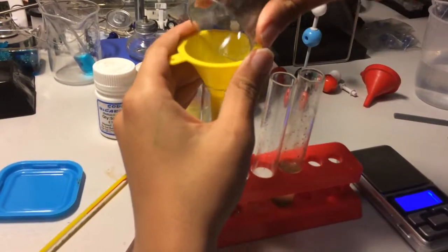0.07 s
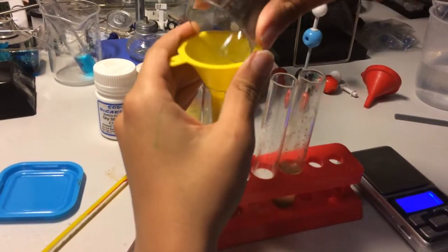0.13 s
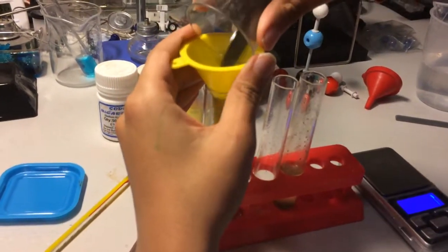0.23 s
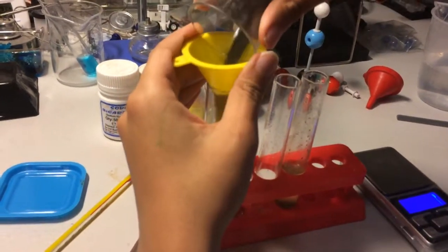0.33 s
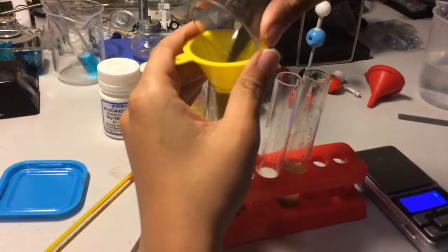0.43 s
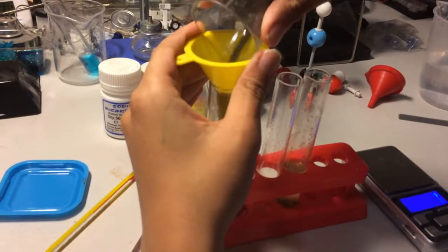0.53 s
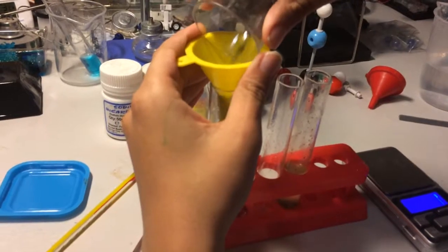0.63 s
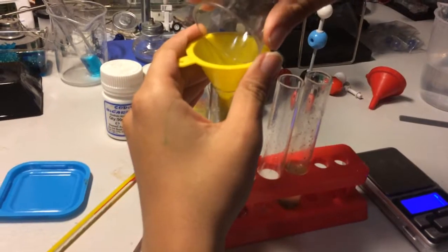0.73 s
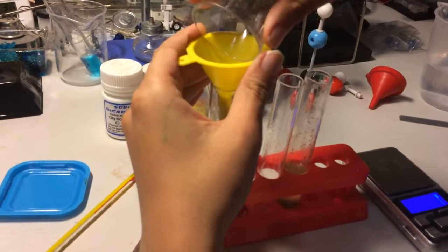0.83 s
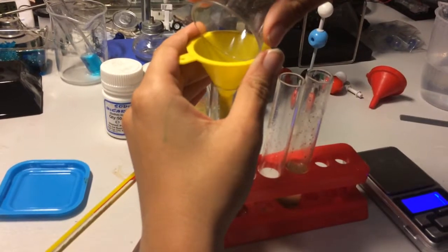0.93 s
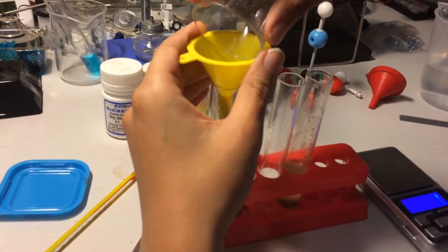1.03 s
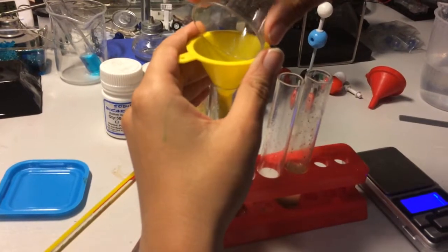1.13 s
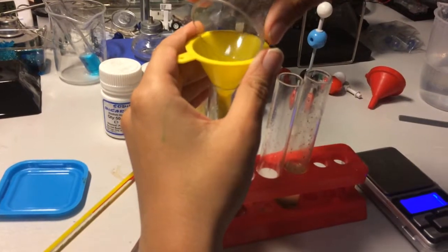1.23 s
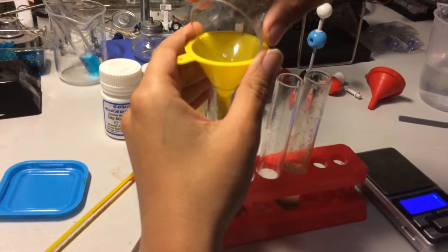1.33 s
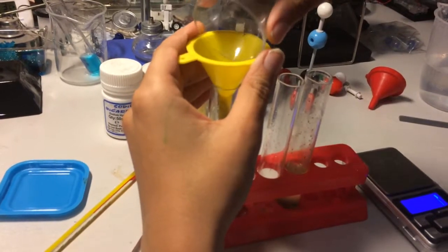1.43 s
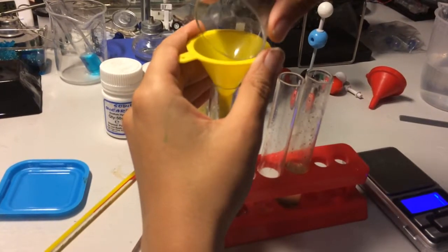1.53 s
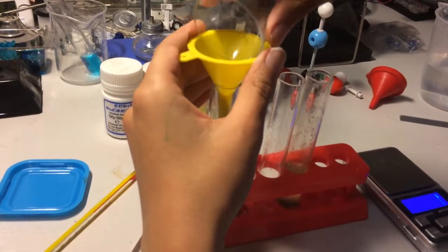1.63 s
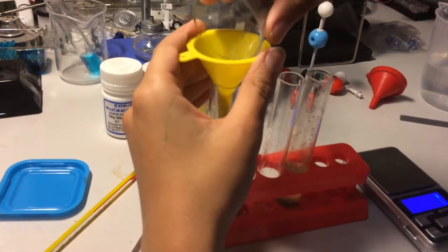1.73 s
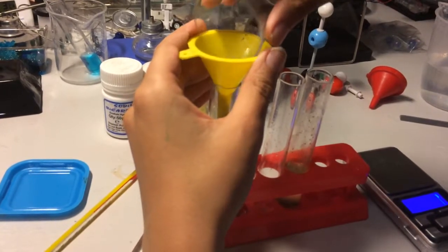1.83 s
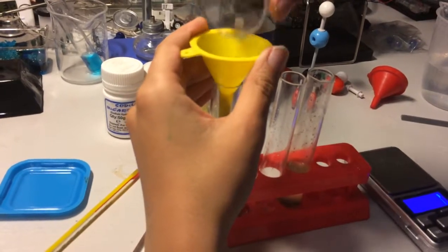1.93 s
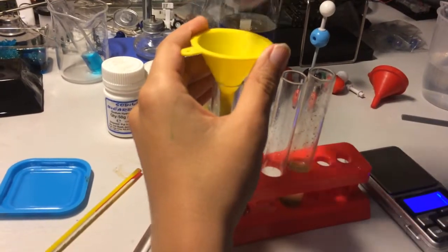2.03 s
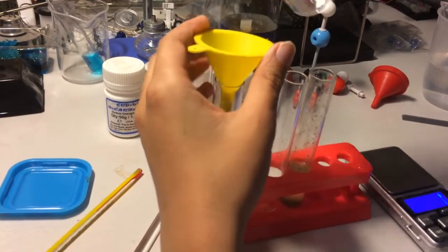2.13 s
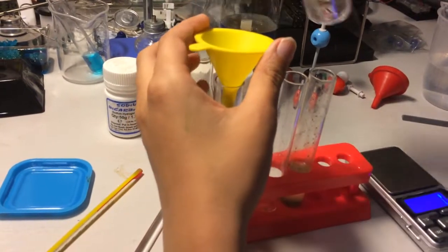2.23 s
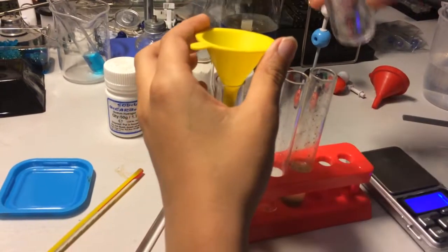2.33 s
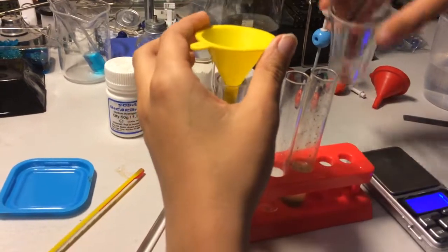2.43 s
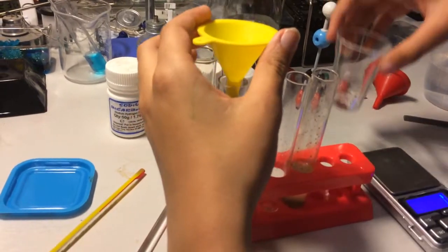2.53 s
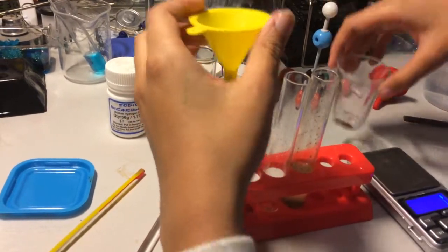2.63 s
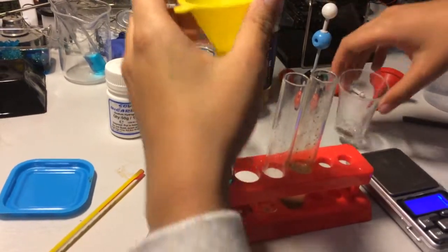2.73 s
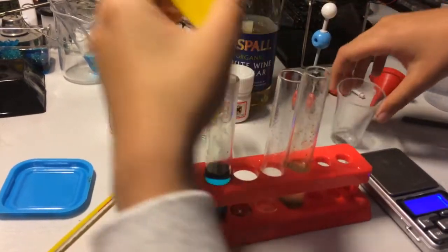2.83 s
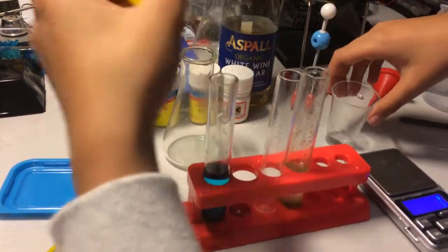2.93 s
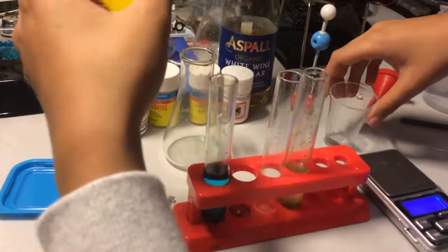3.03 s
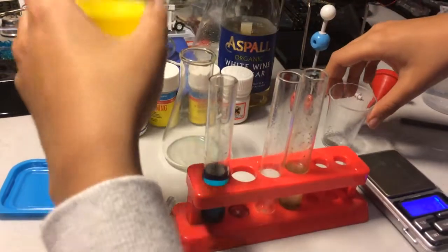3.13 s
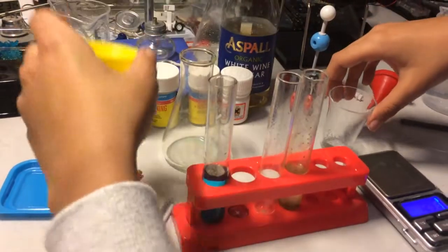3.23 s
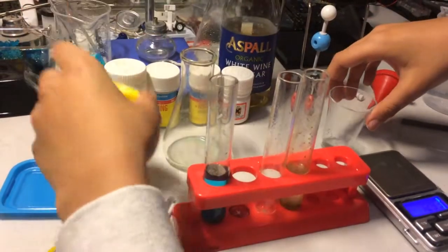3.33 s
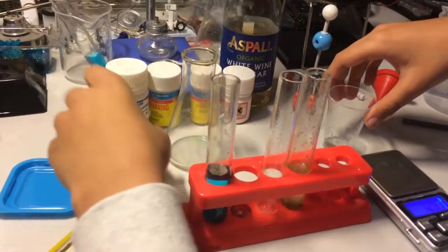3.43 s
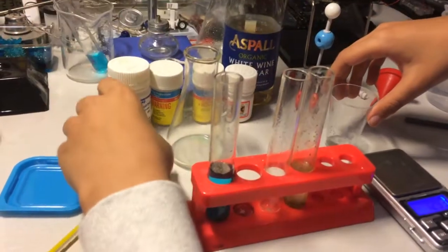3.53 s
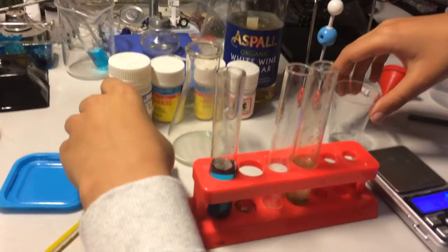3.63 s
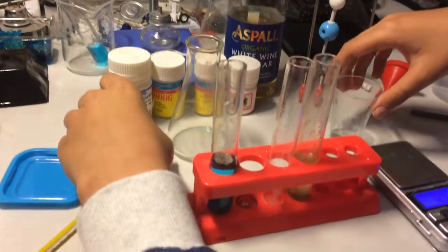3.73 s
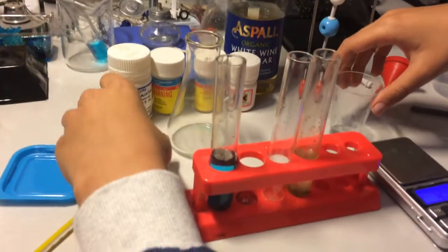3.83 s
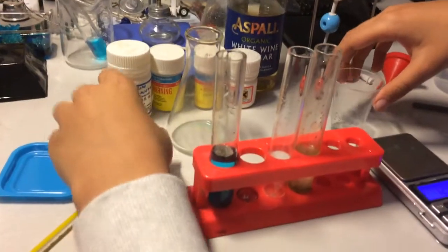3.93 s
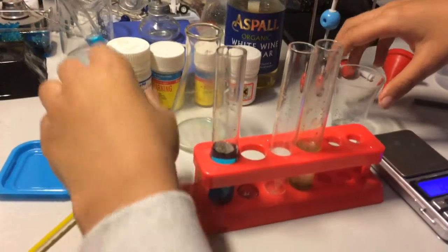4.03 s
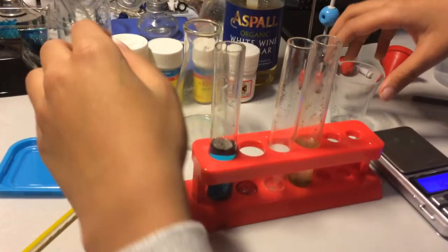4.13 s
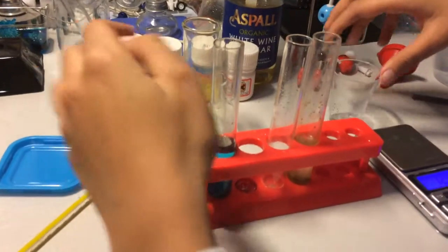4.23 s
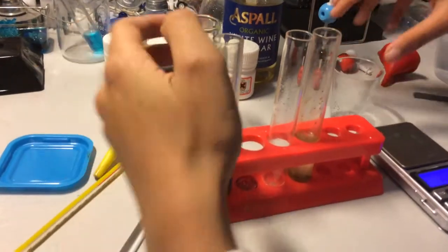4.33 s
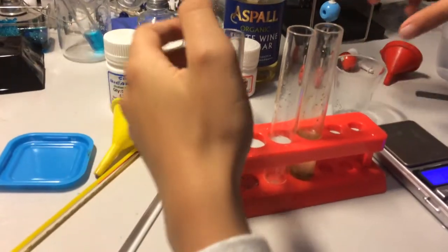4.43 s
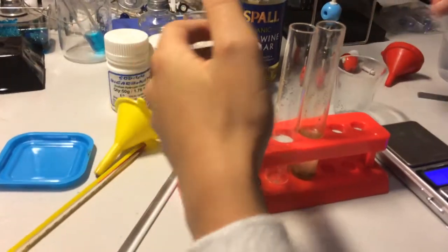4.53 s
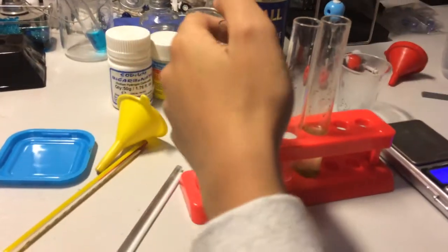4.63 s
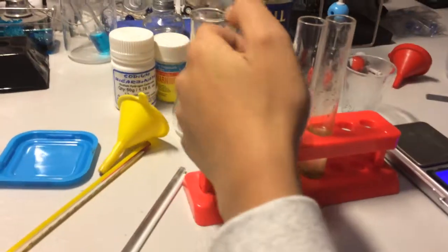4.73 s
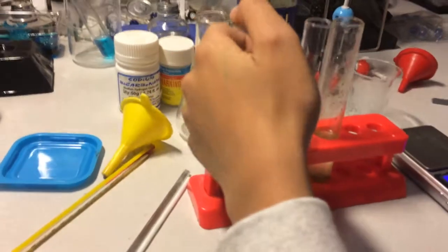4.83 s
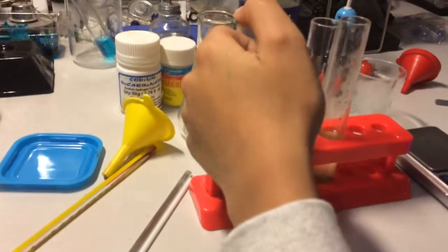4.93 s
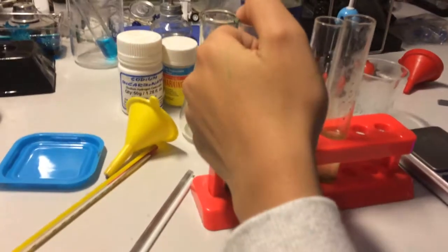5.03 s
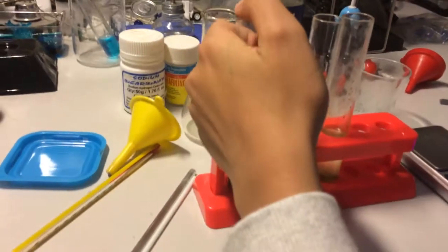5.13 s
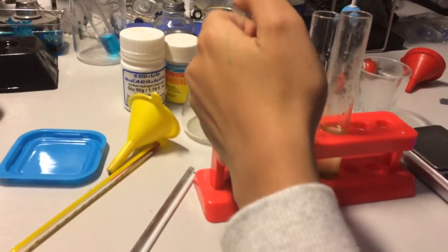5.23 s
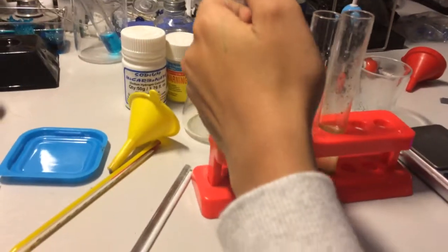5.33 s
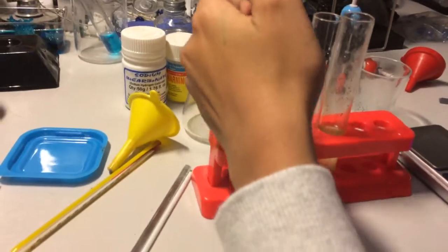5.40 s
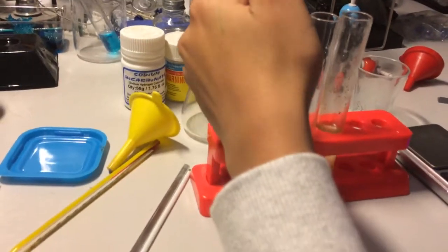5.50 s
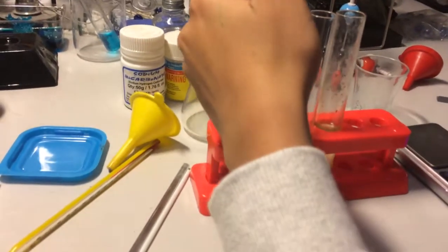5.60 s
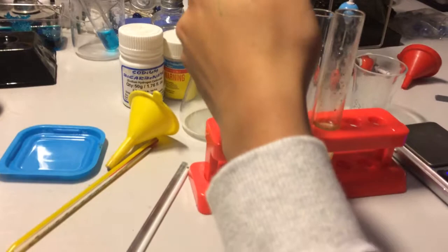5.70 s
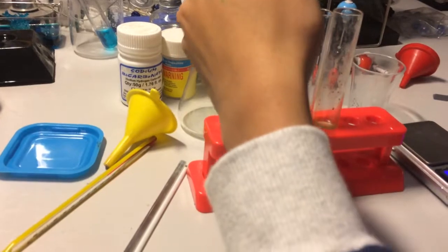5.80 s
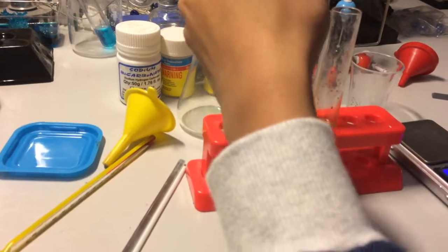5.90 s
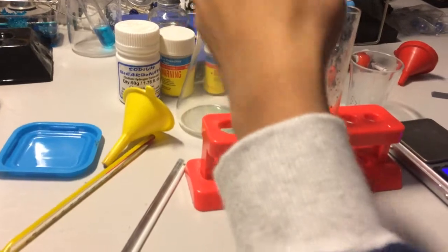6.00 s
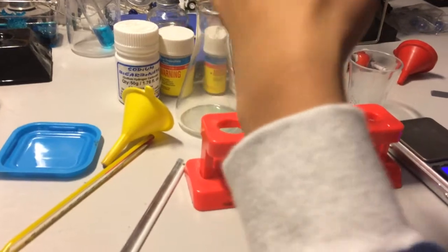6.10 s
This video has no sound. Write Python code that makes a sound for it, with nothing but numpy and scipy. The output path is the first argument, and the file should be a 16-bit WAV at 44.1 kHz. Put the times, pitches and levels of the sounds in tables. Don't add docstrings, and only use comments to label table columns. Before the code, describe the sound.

In a quiet small room with a low fridge hum, grains hiss briefly into a plastic funnel, then light taps follow. A beaker lands hard on the table with a short ring; the funnel bounces dully, is flicked and clacks down. Finally a tube knocks about in a plastic rack, which drops with a loud judder. Sparse distant ticks come through the walls. Close phone microphone.

```python
import sys
import numpy as np
from scipy import signal
from scipy.fft import rfft, irfft
from scipy.io import wavfile
from scipy.ndimage import uniform_filter1d

SR = 44100
rng = np.random.default_rng(int(sys.argv[2]) if len(sys.argv) > 2 else 0)


def wrap_up_sound(samples):
    columns = np.atleast_2d(samples).T
    tamed = np.clip(columns, -1, 1)
    steps = np.round(tamed * 32767).astype(np.int16)
    wavfile.write(sys.argv[1], SR, steps)


def gain_from_db(level_db):
    decades = np.asarray(level_db, float) / 20
    return 10 ** decades


N = 271700


def band(x, hz, width_hz):
    edges_hz = [max(hz - width_hz / 2, 10), min(hz + width_hz / 2, .48 * SR)]
    return signal.sosfilt(signal.butter(2, edges_hz, "band", fs=SR, output="sos"), x)


def unit(x):
    return x / np.sqrt(np.mean(x ** 2))


def peak(x):
    return x / np.abs(x).max()


def fade(t, t60_s):
    return np.exp(-np.log(1000) * t / t60_s)


def add(out, start_s, sound):
    i = int(start_s * SR)
    out[i:i + len(sound)] += sound[:N - i]


def read(table, hz):
    f, db = np.transpose(table)
    return np.interp(np.log(hz), np.log(f), db)


def walk(rate_hz):
    hold = int(SR / rate_hz)
    steps = np.repeat(rng.standard_normal(N // hold + 1), hold)
    return unit(uniform_filter1d(uniform_filter1d(steps, hold), hold)[:N])


def grains(rate_hz, scatter_db):
    hits = (rng.random(N) < rate_hz / SR) * rng.standard_normal(N)
    return unit(hits * gain_from_db(scatter_db * rng.exponential(size=N)))


def floor():
    # band_hz, density_db (per Hz)
    noise_tone = [(20, -25), (59, -11), (121, -8), (377, -13.5), (774, -17), (865, -12.5), (1510, -24),
                  (1900, -20), (2380, -27), (2750, -30.5), (10500, -39), (12000, -37.5), (13800, -36.5),
                  (15000, -61)]
    # pitch_hz, rms_db, wobble_hz
    hum = [(119.6, -64.5, 4.51), (90.5, -74.5, 4.8), (122.4, -67.5, 10.62), (197.6, -71.5, 7.2),
           (235, -75, 2.7), (4708, -92.5, 3.), (12250, -89, 1.5)]
    floor_db = -59
    out, swell = 0, walk(1.8)
    for hz in 24 * 2 ** np.arange(0, 9.4, 1 / 3):
        wander_db = min(300 / hz, 1) * (1.6 * swell + 2.4 * walk(9))
        db = read(noise_tone, hz) + 10 * np.log10(hz) + wander_db
        out = out + gain_from_db(db) * unit(band(rng.standard_normal(N), hz, 0.26 * hz))
    out = gain_from_db(floor_db - 3.0) * unit(out)
    for hz, db, wobble_hz in hum:
        phase = 2 * np.pi * np.cumsum(hz + wobble_hz * walk(25)) / SR
        out += gain_from_db(db + 2.0 + 2.42 * min(400 / hz, 1) * walk(42)) * np.sin(phase)
    return out


def filings():
    # time_s, level_db
    pour = [
        (0.0, -92),
        (0.11, -78),
        (0.254, -72.5),
        (0.345, -67.5),
        (0.66, -72.5),
        (0.9, -82.5),
    ]
    # pitch_hz, width_hz, level_db
    slide = [(7260, 220, 0), (8950, 570, 4.5), (12800, 590, 11.5), (13400, 160, -2)]
    cone_from_s, cone_attack_s, cone_db = 0.32, 0.027, -65.5
    t = np.arange(N) / SR
    flow_db = np.interp(t, *np.transpose(pour), right=-150)
    landed = np.clip((t - cone_from_s) / cone_attack_s, 0, 1)
    cone = landed * gain_from_db(cone_db + 0.96 * (flow_db - flow_db.max()))
    rain = grains(9800, 0.53)
    hiss = band(rain, 8700, 5900) * gain_from_db(-2.0)
    hiss = hiss + sum(gain_from_db(db) * band(rain, hz, 3 * width_hz + 400) for hz, width_hz, db in slide)
    ring = unit(band(rain, 3010, 510)) + gain_from_db(-1.5) * unit(band(rain, 5950, 4200))
    return gain_from_db(flow_db) * unit(hiss) + cone * gain_from_db(-2.5) * ring


def clicker():
    # start_s, peak_db, low_db (under 2.6 kHz), sizzle_db (over 7.8 kHz)
    ticks = [(1.073, -35, 0.5, -7.5), (2.2397, -35.5, 0, -7), (2.312, -40, 1.5, 0.54), (2.77, -32.5, 0, -7),
             (4.3444, -32.5, -1, -7.5), (4.6678, -32, 0.5, -8.5), (4.8, -32.5, -1.5, -24),
             (4.856, -37, 2, -28), (4.993, -34.5, 0.5, -19), (5.0827, -36.5, 1, -23),
             (5.3039, -33.5, 1.5, -19)]
    # pitch_hz, density_db (per Hz)
    case_tone = [(200, -9), (750, 2.5), (1060, -17), (2000, -9.5), (4300, -17.5), (6600, -29.5),
                 (9500, -35.5), (13500, -13.5)]
    # pitch_hz, width_hz, level_db (over the case)
    case_rings = [(1420, 64, 6.5), (1900, 17, 13.5), (2203, 24, 9.5), (2303, 41, 9.5), (3070, 120, 13.5),
                  (3620, 270, 10), (3950, 100, 9), (4730, 120, 10), (6400, 247, 11)]
    # delay_s, level_db, spread_s
    wall_paths = [(.001, 0, .0025), (.005, -5, .002), (.013, -6, .002), (.018, 2, .003), (.027, -7, .003),
                  (.036, -9, .004)]
    # band_hz, first_db (first arrival), late_db (later arrivals), t60_s
    room_bands = [(520, 7, -4.5, 0.19), (1900, 1.5, 6, 0.24), (3980, -1.5, 3, 0.23),
                  (6180, -1.5, -2.5, 0.26), (10700, -29, 9, 0.22)]
    # pitch_hz, width_hz, level_db
    loose_part = [(4730, 4200, 2.5), (8450, 1400, 2.5), (9400, 1400, -2), (12200, 1300, -0.5)]
    sizzle_top_db = -22
    t = np.arange(int(.25 * SR)) / SR
    paths = [gain_from_db(db) * (t > lag_s - .001) * np.exp(-np.abs(t - lag_s) / spread_s)
             for lag_s, db, spread_s in wall_paths]
    f = np.maximum(np.arange(len(t) // 2 + 1) * SR / len(t), 1)
    rings_db = sum(db / (1 + ((f - hz) / width_hz) ** 2) for hz, width_hz, db in case_rings)
    colour = gain_from_db(read(case_tone, f) + rings_db)
    same, *fresh = rng.standard_normal((len(ticks) + 1, len(t)))
    out = np.zeros(N)
    for (start_s, db, low_db, sizzle_db), own in zip(ticks, fresh):
        case = irfft(rfft(same + .6 * own) * colour, len(t))
        parts = []
        for hz, first_db, late_db, t60_s in room_bands:
            diffuse = gain_from_db(-3.5) * (1 - np.exp(-t / 0.005)) * fade(t, 1.15 * t60_s)
            shape = gain_from_db(first_db) * paths[0] + gain_from_db(late_db) * (sum(paths[1:]) + diffuse)
            parts.append(band(case, hz, hz if hz < 1000 else 0.86 * hz) * shape)
        low = peak(parts[0] + parts[1])
        middle = peak(parts[2] + parts[3])
        sizzle = peak(parts[4])
        hiss = sum(gain_from_db(d) * band(band(own, hz, width_hz), hz, width_hz) for hz, width_hz, d in loose_part)
        rattle = gain_from_db(2.92 * sizzle_db + 1.5) * peak(hiss * shape)
        sizzle = gain_from_db(min(sizzle_db, sizzle_top_db)) * sizzle
        add(out, start_s, gain_from_db(db) * (middle + gain_from_db(low_db) * low + sizzle + rattle))
    return out


def body(clear, tone, t60_s, slope, count=200):
    hz = 250 + 14000 * ((np.arange(count) + rng.random(count)) / count) ** 2
    dense = np.transpose([hz, 0 * hz, t60_s * (1000 / hz) ** slope])
    hz, db, t60_s = (c[:, None] for c in np.vstack([clear, dense]).T)
    db = db + read(tone, hz) + 10 * np.log10(np.sqrt(hz) / t60_s)
    loose = np.where(np.arange(len(hz)) < len(clear), .3, 1)[:, None]
    return hz, db, t60_s, loose


def knocks(events, modes, scatter_db, focus_db, chatter_db, thud_db, ring, grip, top_hz=13350, soft=0):
    split_hz, in_phase = 2500, .6
    hz, db, t60_s, loose = modes
    t = np.arange(int(.15 * SR)) / SR
    waves = np.sin(2 * np.pi * hz * t)
    chance = rng.standard_normal((len(events), 2, len(hz), 1))
    forces = rng.standard_normal((len(events), 1500))
    low = hz[:, 0] < split_hz
    hardest_db = max(row[1] for row in events)
    thud = np.sin(2 * np.pi * 150 * t) * (1 - np.exp(-t / 0.00057)) * fade(t, 0.011)
    out = np.zeros(N)
    for (start_s, peak_db, treble_db, best_hz, chatter_ms), (mix, side), force in zip(events, chance, forces):
        length = np.clip(ring + grip * (hardest_db - peak_db), .1, 1.3)
        octaves_off = np.minimum(np.abs(np.log2(hz / best_hz)), 1.5)
        focus = -focus_db * octaves_off * (hz < split_hz)
        sign = np.sign(loose * side + in_phase)
        rings = sign * gain_from_db(db + scatter_db * loose * mix + focus) * fade(t, t60_s * length) * waves
        force = gain_from_db(chatter_db) * force * np.exp(-1000 * t[:len(force)] / max(chatter_ms, .1))
        force[0] = 1
        edge = force * np.where(np.arange(len(force)) > 0, gain_from_db(4.0), 1)
        dull = signal.fftconvolve(rings[low].sum(0), force)
        bright = signal.fftconvolve(rings[~low].sum(0), edge)
        dull = peak(band(band(dull, 1712, 2544), 1644, 3640))
        bright = band(bright, (top_hz + 2800) / 2, top_hz - 2800)
        bright = peak(band(bright, (top_hz + 2000) / 2, top_hz - 2000))
        if soft:
            dull = peak(peak(band(dull, best_hz, soft * best_hz)) + gain_from_db(treble_db + 8) * dull)
        add(out, start_s + 0.0011, gain_from_db(peak_db) * (dull + gain_from_db(treble_db) * bright))
        add(out, start_s + 0.0017, gain_from_db(peak_db + thud_db) * thud)
    return out


def funnel_taps():
    # start_s, peak_db, treble_db (over 2.5 kHz), best_hz, chatter_ms
    taps = [(1.43, -53, -22, 1040, 0.65), (1.63, -45.5, -4, 1350, 0.69), (1.6695, -39.5, 2, 1350, 2),
            (1.679, -41.5, -5.5, 1200, 0.57), (1.84, -48, -9, 1380, .54), (1.858, -33.5, -1.5, 1390, 0.55),
            (1.87, -42.5, -8, 1210, 0.54), (1.881, -57, -15, 1420, .5), (2.228, -63, 6, 1900, .5),
            (2.69, -71, 17, 1500, 2.9), (2.702, -72, 17, 1510, 13)]
    # pitch_hz, level_db (over the dense modes), t60_s
    clear = [(1336, 27, 0.023), (1080, 14, 0.017), (2580, 7, 0.0097), (2820, 25, 0.015),
             (3190, 20.5, 0.012), (3600, 15.5, 0.011)]
    # pitch_hz, level_db
    tone = [(300, -21), (800, -10), (1350, 4), (2050, -45), (2800, 1), (3900, 1), (6000, -21), (14000, -47)]
    return knocks(taps, body(clear, tone, 0.048, 0.33), 2.8, 3.7, -19.5, -45, ring=0.92, grip=0.0028)


def rubbing():
    # hardest_s, dull_db, bright_db (re dull), swell_s, release_s (times for 20 dB)
    strokes = [
        (2.705, -70, -6, 0.068, 0.046),
        (3.294, -63.5, -26, 0.13, 0.046),
        (5.31, -52, -16, 0.09, 0.12),
        (5.56, -64.5, -23, 0.19, 0.16),
        (5.826, -68, -4, 0.13, 0.084),
    ]
    out, t = 0, np.arange(N) / SR
    for hardest_s, db, bright_db, swell_s, release_s in strokes:
        press = gain_from_db(db - 20 * np.maximum((hardest_s - t) / swell_s, (t - hardest_s) / release_s))
        slips = grains(3600, 1.5) * gain_from_db(3.3 * walk(60))
        dull = unit(band(band(slips, 950, 1500), 1000, 1700))
        out = out + press * (dull + gain_from_db(bright_db) * unit(band(slips, 7900, 3500)))
    return out


def beaker_set_down():
    # start_s, peak_db, treble_db (over 2.5 kHz), best_hz, chatter_ms
    touches = [
        (2.867, -36.5, -20, 860, 0.83),
        (2.896, -47.5, -11, 915, 1.3),
        (2.9435, -37, -17, 900, 3.6),
    ]
    landings = [
        (2.9605, -8, -13.5, 1514, .4),
        (2.9638, -18, -12, 1500, .6),
        (2.9658, -9, -18, 1500, 0.5),
        (2.9711, -14, -15.5, 1527, 1.0),
    ]
    # pitch_hz, level_db (over the dense modes), t60_s
    clear = [(406, 7.2, 0.029), (1564, 5.2, 0.093), (879, 10, 0.0806), (1125, 7.7, 0.08), (1314, 4.5, 0.16),
             (1430, 3.7, 0.39), (1531, 13.2, 0.077), (1846, 5.7, 0.075), (2034, 8.6, 0.13),
             (2270, 8.5, 0.098), (2567, 14, 0.072), (4830, 9, .018), (1780, 5.9, 0.093), (4900, 8, 0.028)]
    # pitch_hz, level_db
    tone = [(280, -50), (400, -2), (850, -12), (1500, 3.5), (2300, -5.5), (3300, -23), (3900, -28),
            (8000, -42.5), (14000, -36)]
    beaker = body(clear, tone, 0.16, 0.35)
    out = knocks(touches, beaker, 7.9, 37.0, -10, -32.5, ring=0.55, grip=.03, soft=0.92)
    return out + knocks(landings, beaker, 3.7, 1.4, -21.5, -37.0, ring=0.73, grip=0.042)


def glass():
    # start_s, pitch_hz, peak_db, t60_s
    tings = [(3.9, 8800, -67, 0.066), (4.806, 9900, -62, 0.07), (4.838, 9950, -64, 0.05),
             (4.935, 6200, -72, .15), (2.9615, 10600, -38, 0.03), (2.9615, 12350, -41, 0.022),
             (2.9615, 7560, -43, .04), (5.004, 7350, -43.5, .025), (5.003, 11000, -47, .028),
             (5.004, 12900, -44, 0.03)]
    # start_s, length_s, pitch_hz, rms_db, fall_db (per overtone)
    squeaks = [
        (5.161, 0.025, 604, -44, -4.5),
        (5.72, 0.11, 575, -60, -35),
    ]
    out = np.zeros(N)
    t = np.arange(int(.2 * SR)) / SR
    for start_s, hz, db, t60_s in tings:
        add(out, start_s, gain_from_db(db) * (1 - np.exp(-t / 0.0002)) * fade(t, t60_s) * np.sin(2 * np.pi * hz * t))
    for start_s, length_s, hz, db, fall_db in squeaks:
        i = np.arange(int(length_s * SR))
        phase = 2 * np.pi * np.cumsum(hz * (1 + 0.016 * walk(60)[i])) / SR
        tone = sum(gain_from_db(k * fall_db) * np.sin((k + 1) * phase) for k in range(3))
        swell = gain_from_db(db + 3.5 + 2.4 * walk(490)[i]) * np.hanning(len(i)) ** 0.47
        add(out, start_s, swell * tone)
    return out


def funnel_drop():
    # start_s, peak_db, treble_db (over 2.5 kHz), best_hz, chatter_ms
    bounces = [
        (3.288, -53, -30, 520, 5),
        (3.3905, -25, -32, 1500, 0.3),
        (3.3951, -27, -40, 1300, .4),
        (3.3997, -27, -44, 1300, 0.4),
    ]
    # pitch_hz, level_db (over the dense modes), t60_s
    clear = [(408, 19, .045), (545, 3, .06), (665, 6, .08), (875, 9, .09), (1106, 22, .08), (1315, 13, .1),
             (1398, 6, .08), (1514, 27, .12), (1750, 21, .11), (2150, 16, .06)]
    # pitch_hz, level_db
    tone = [(250, -45), (400, 9), (1000, -5.5), (1500, -5.5), (2200, -43), (3000, -37), (14000, -37)]
    modes = body(clear, tone, 0.034, 0.27)
    return knocks(bounces, modes, 1.3, 7.0, -8, -38, ring=0.95, grip=0.02, top_hz=3500)


def nail_flicks():
    # start_s, peak_db, treble_db (over 2.5 kHz), best_hz, chatter_ms
    flicks = [
        (3.531, -68, 8, 1500, 1.5),
        (3.5985, -55, 8, 1500, 2.3),
        (3.609, -47, 1.8, 1110, 6.5),
        (3.855, -71, 8.8, 1500, 3.4),
        (4.319, -65, 8, 1500, 0.68),
        (4.33, -69, 8, 1500, 0.55),
    ]
    # pitch_hz, level_db (over the dense modes), t60_s
    clear = [(1100, 6.9, 0.022), (3630, 15, 0.025), (4870, 4, .015)]
    # pitch_hz, level_db
    tone = [(250, -27), (1200, 16), (2500, -4), (5000, -12), (9000, -14), (14000, -10.5)]
    return knocks(flicks, body(clear, tone, 0.012, 0.27), 2.4, 3, -13.5, -24, ring=1.0, grip=0)


def funnel_down():
    # start_s, peak_db, treble_db (over 2.5 kHz), best_hz, chatter_ms
    contacts = [
        (3.804, -69.5, -14, 950, .5),
        (3.9525, -38.5, 4, 800, 4.1),
        (4.108, -61, 0, 1490, .5),
    ]
    # pitch_hz, level_db (over the dense modes), t60_s
    clear = [(800, 15, 0.027), (1740, 2.1, 0.018), (2540, 3.6, 0.025), (3240, 8.2, 0.021)]
    # pitch_hz, level_db
    tone = [(250, -30), (600, -16), (1300, -11), (1900, -15), (3400, -14.5), (3900, -9), (5500, -19),
            (9000, -31), (14000, -39)]
    return knocks(contacts, body(clear, tone, 0.021, 0.46), 0.69, 6.1, -13.0, -4, ring=0.66, grip=0.017)


def funnel_tips():
    # start_s, peak_db, treble_db (over 2.5 kHz), best_hz, chatter_ms
    clacks = [
        (4.0028, -23, -10.5, 1900, 0.5),
        (4.008, -41, -5, 1900, 6),
        (4.021, -43, -14, 1400, 3),
    ]
    # pitch_hz, level_db (over the dense modes), t60_s
    clear = [(1790, 15, 0.011), (1540, 8.2, 0.018), (2250, 15, 0.013), (2400, 9.4, 0.012),
             (3280, 20, 0.012), (3430, 11, .014), (1110, 6, .012)]
    # pitch_hz, level_db
    tone = [(250, -19), (1000, -5), (1800, 10), (2550, 9.5), (2850, -19), (3300, -6), (3700, -57),
            (14000, -44)]
    modes = body(clear, tone, 0.024, 0.23)
    return knocks(clacks, modes, 0.76, 2.4, -12, -35, ring=1.0, grip=0, top_hz=3750)


def rack_knocks():
    # start_s, peak_db, treble_db (over 2.5 kHz), best_hz, chatter_ms
    tube_knocks = [(4.836, -34, -15, 1270, 6.4), (4.875, -31.5, -15, 1420, 1.4),
                   (4.887, -35, -14.5, 1080, 1.3), (5.116, -40, -33, 756, 6), (5.132, -62, -25, 1200, 1.5),
                   (5.147, -40.5, -13, 1210, 2.7), (5.18, -38.5, -14, 920, 8.8),
                   (5.194, -43.5, -28, 1500, 2.5), (5.234, -39.5, -13.5, 1590, 3.3),
                   (5.255, -42.5, -15, 1490, 16), (5.283, -33, -16, 875, 4), (5.339, -33.5, -23, 1550, 1.5),
                   (5.317, -39, -25, 1470, 1.7), (5.356, -33, -16, 1050, 1.4),
                   (5.375, -22.5, -6.5, 1080, 3.7), (5.398, -31.5, -8, 1370, 0.75),
                   (5.527, -41.5, -12, 784, 3.8), (5.539, -45, -20, 1500, 3.2), (5.546, -44, -22, 1000, 2),
                   (5.575, -43, -16, 1480, 6.5), (5.626, -28, -10, 1010, 3.1), (5.638, -36, -11, 748, 3.8),
                   (5.672, -44, -22, 1230, 1.8), (5.825, -51, -10, 1420, 6.6)]
    judders = [(5.4165, -20.5, -10, 1250, 1.5), (5.4245, -4.5, -11, 1000, 1), (5.42635, -8, -16, 1000, 1),
               (5.4319, -19, -9, 1050, 3), (5.4356, -18, -11, 850, 3), (5.4402, -14, -13, 800, 3),
               (5.4439, -14, -13, 1200, 3), (5.4495, -14, -11, 1250, 3), (5.457, -17, -13, 1400, 3),
               (5.466, -25, -9, 950, 2), (5.472, -28, -8, 1200, 2), (5.6025, -34, -26, 850, 1.5)]
    # pitch_hz, level_db (over the dense modes), t60_s
    clear = [(608, 0, .07), (782, 13, .1), (853, 12, .09), (975, 7, .1), (1078, 9, .11), (1215, 10, .12),
             (1333, 2, .09), (1440, 8, .11), (1742, 4, .08), (1910, 7, .1), (2480, 6, .07), (3085, 6, .05),
             (3494, 6, .07)]
    # pitch_hz, level_db
    tone = [(280, -51), (520, -34), (800, -17.5), (1150, -7), (1600, 0), (2300, -3), (4500, -13.5),
            (14000, -28.5)]
    rack = body(clear, tone, 0.11, 0.16)
    out = knocks(judders, rack, 1.2, 4.8, -12, -15.5, ring=0.39, grip=0.0028, soft=0.88)
    return out + knocks(tube_knocks, rack, 7.0, 12.0, -17.5, -26.0, ring=0.44, grip=0.0026, soft=0.5)


def room(x):
    # band_hz, t60_s, level_db
    room_tails = [(148.8, 0.36, -22), (390, 0.11, -13.5), (1000, 0.14, -9.5), (2183, 0.16, -9),
                  (4400, 0.19, -12), (8830, 0.31, -20)]
    t = np.arange(int(.5 * SR)) / SR
    noise = rng.standard_normal(len(t))
    tails = [band(noise, hz, 0.84 * hz) * fade(t, t60_s) * gain_from_db(db + 8.0) / np.sqrt(t60_s * SR / 14)
             for hz, t60_s, db in room_tails]
    paths = rfft((t == 0) + sum(tails) * (1 - np.exp(-t / 0.0016)))
    power = np.abs(paths) ** 2
    broad = uniform_filter1d(uniform_filter1d(power, 200), 200)
    fine = uniform_filter1d(uniform_filter1d(power, 16), 16)
    even = irfft(.5 * np.log(broad / fine), len(t))
    even = np.exp(rfft(even * np.where(t == 0, 1, 2 * (t < t[-1] / 2))))
    return signal.fftconvolve(x, irfft(paths * even, len(t)))[:N]


def scene():
    near = filings() + funnel_taps() + rubbing() + beaker_set_down() + glass()
    near += funnel_drop() + nail_flicks() + funnel_down() + funnel_tips() + rack_knocks()
    return (room(near) + gain_from_db(4.0) * clicker() + floor())[None]


def top_cut(x):
    return signal.sosfilt(signal.butter(12, 15350, fs=SR, output="sos"), x)


def record(dry):
    top_hz = 14400
    cut = signal.sosfilt(signal.ellip(8, .3, 45, top_hz, fs=SR, output="sos"), dry)
    return top_cut(cut)


dry = scene()
out = record(dry)
wrap_up_sound(out)
```